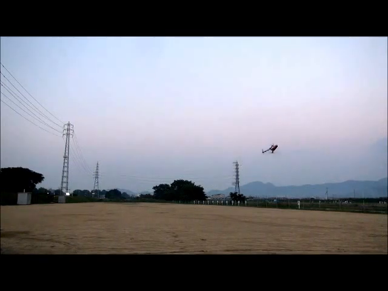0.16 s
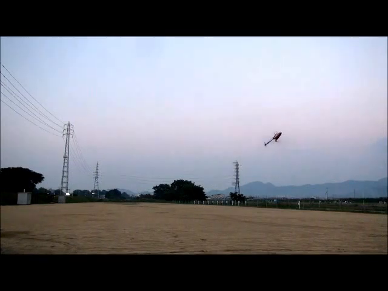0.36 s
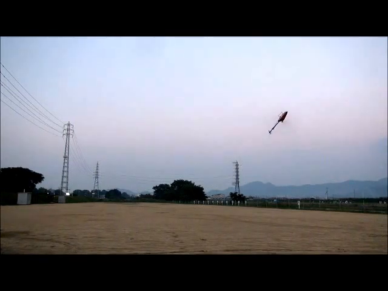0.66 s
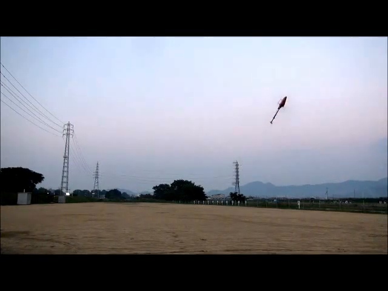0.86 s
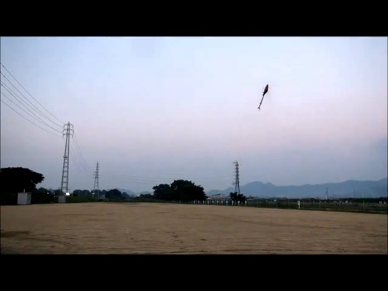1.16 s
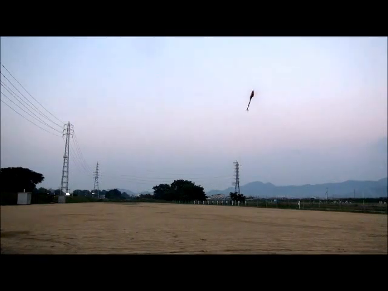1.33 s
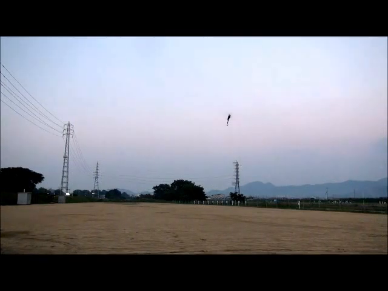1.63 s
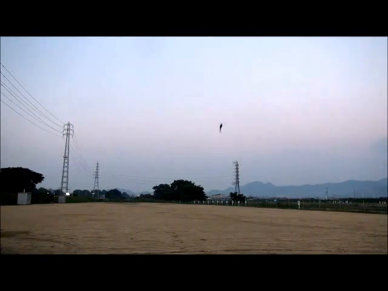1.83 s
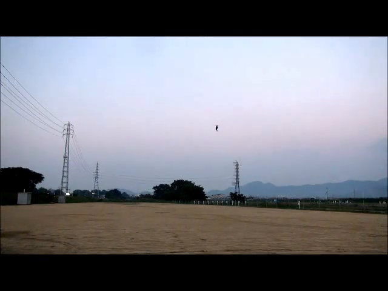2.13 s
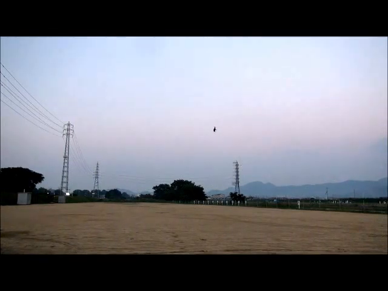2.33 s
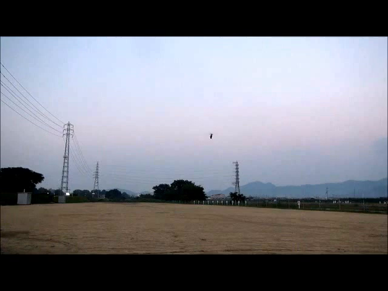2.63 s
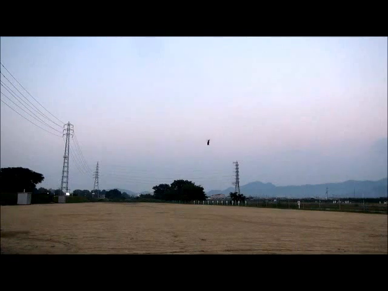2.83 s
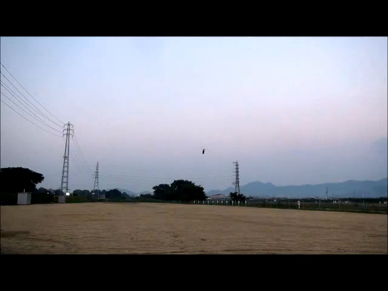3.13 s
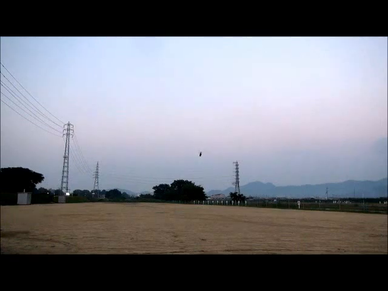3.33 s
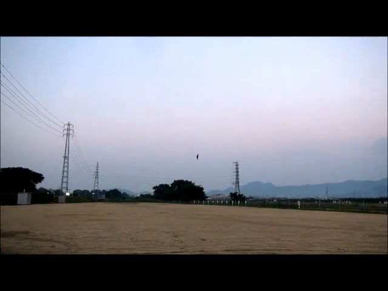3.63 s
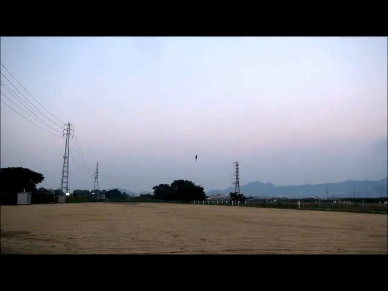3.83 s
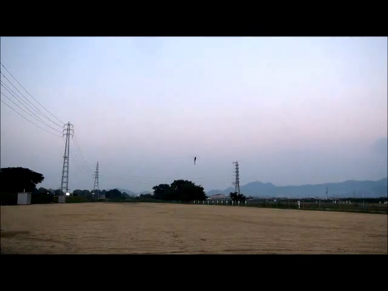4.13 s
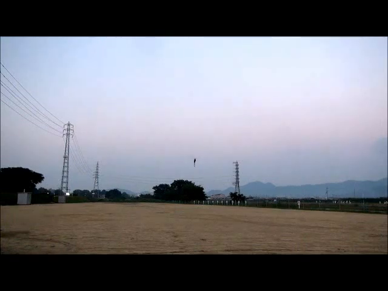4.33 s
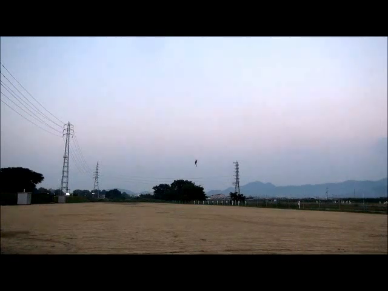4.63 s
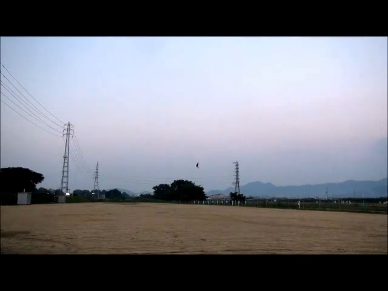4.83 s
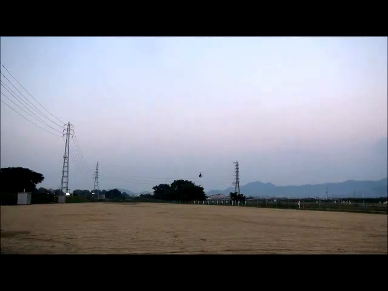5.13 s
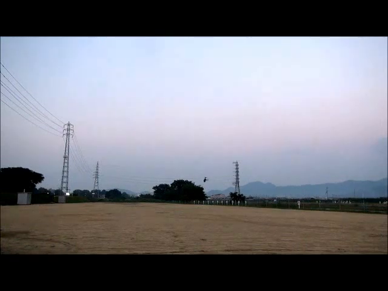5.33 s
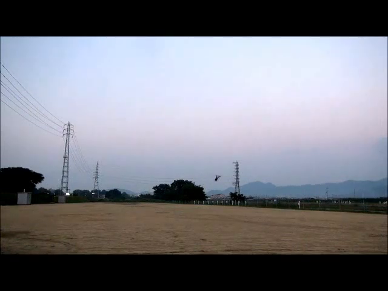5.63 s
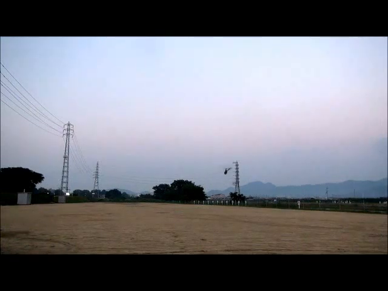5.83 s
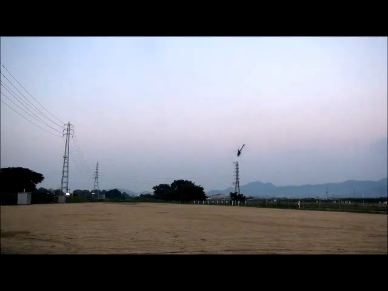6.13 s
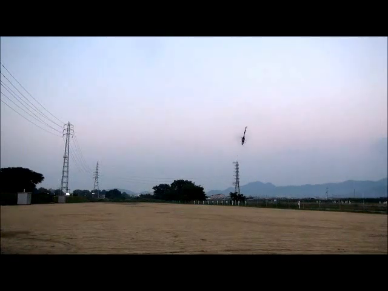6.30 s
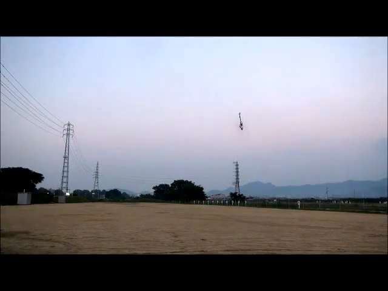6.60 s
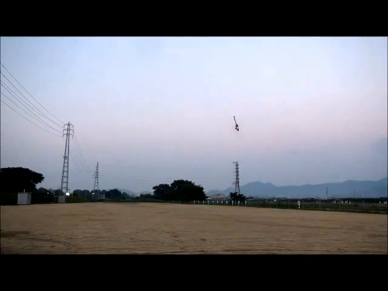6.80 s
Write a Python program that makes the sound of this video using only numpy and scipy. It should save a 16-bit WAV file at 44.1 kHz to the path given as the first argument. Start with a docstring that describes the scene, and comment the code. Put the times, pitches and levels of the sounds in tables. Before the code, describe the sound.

An electric model helicopter runs throughout about seven seconds over an open dirt field. At 0 s it is close: buzzing tail rotor, motor hum, rapid blade thump near 89 beats a second, and a raspy whine around 6.5 kHz with treble fizz. Rushing air grows until 0.9 s, when a sharp slap burst sounds and the pitch sags, lowest near 1.3 s, with duller knocking. The sound leans slightly right, then recentres. Pitch recovers around 2 s with more slaps and a swish. From 2.7 to 3.5 s the pulsing whine stands out; it dips, then rough gears and slaps swell at 4-4.7 s. Around 5.6 s the whine peaks again. At 6.4 s a strong low thump and rush arrive, pitch sags once more, and slaps continue to the end. A moving ground echo gives hollow, sweeping coloration; the narrow stereo microphone cuts the extreme treble.

```python
"""An electric model helicopter loops over a dirt field, moving away and back.
Its two blades thump with steady tones, swish with throbbing noise and slap their own wake in bursts.
The main gear whines and rasps, the tail rotor buzzes, the motor hums and the downwash rumbles.
The ground returns a slightly later copy, whose changing delay sweeps a comb through the sound."""
import sys
import numpy as np
from scipy import signal
from scipy.fft import rfft, irfft, next_fast_len
from scipy.io import wavfile
from scipy.ndimage import map_coordinates

SR = 44100
rng = np.random.default_rng(int(sys.argv[2]) if len(sys.argv) > 2 else 0)


def materialize(psi):
    """Save the field psi as 16-bit PCM at rate SR to the path in sys.argv[1].

    A 1-D psi becomes a single channel; in a 2-D psi each row is a channel.
    """
    bounded = np.clip(np.atleast_2d(psi).T, -1, 1)
    quanta = np.round(bounded * 32767).astype(np.int16)
    wavfile.write(sys.argv[1], SR, quanta)


N = 306936
TIME = np.arange(N) / SR

# tone cycles per turn of the main rotor
MESH_ORDER, BELT_ORDER = 150, 196
# shaft turns per turn of the main rotor
TAIL_GEARING, MOTOR_GEARING = 4.266, 12.5


def amp(db):
    """Turns decibels into a gain."""
    return 10 ** (np.asarray(db) / 20)


def unit(x):
    """Scales a signal to rms 1."""
    return x / np.sqrt(np.mean(x ** 2) + 1e-20)


def curve(rows):
    """Joins the points of a two-column table by straight lines in time."""
    seconds, values = np.transpose(rows)
    return np.interp(TIME, seconds, values)


def noise():
    """Makes white noise for the whole scene."""
    return rng.standard_normal(N)


def drift(per_s):
    """Wanders smoothly and by chance, with rms 1, changing about per_s times a second."""
    knots = signal.resample(rng.standard_normal(2048), 16384)  # eight points per random value
    return unit(np.interp(TIME * per_s * 8, np.arange(len(knots)), knots))


def tone(turns, wobble_rad, flutter_db, per_s):
    """A sine whose phase and level waver in the moving air."""
    phase = 2 * np.pi * (turns + rng.random()) + wobble_rad * drift(per_s)
    return np.sqrt(2) * np.sin(phase) * amp(flutter_db * drift(per_s))


def blade_ripple(turns, per_s):
    """Wavers at one, two and three times the blade-passing rate, each part drifting in strength."""
    ripple = np.zeros(N)
    for k in range(1, 4):
        ripple += drift(per_s) * np.cos(2 * np.pi * (2 * k * turns + rng.random()))
    return ripple


def shaped(x, points):
    """Filters a signal by a spectrum drawn with a logarithmic frequency axis."""
    hz, db = np.transpose(points)
    size = next_fast_len(N)
    bins_hz = np.fft.rfftfreq(size, 1 / SR)
    gain = amp(np.interp(np.log(bins_hz + 1), np.log(hz), db))
    return irfft(rfft(x, size) * gain, size)[:N]


def colour(x, points):
    """Gives a signal a spectrum and then rms 1."""
    return unit(shaped(x, points))


def below(x, hz, order=2):
    """Keeps what lies below a frequency, without delay."""
    sos = signal.butter(order, min(hz, SR / 2 - 1), fs=SR, output="sos")
    return signal.sosfiltfilt(sos, x)


def ground(x, delay_ms, strength=0.66, scatter_hz=1000, top_hz=10000):
    """Adds the echo off the dirt, which mirrors the bass, scatters the treble and dulls the very top."""
    # share of the treble that the ground mirrors: t/s, share/0-1
    mirror = [(0, 0.7), (.6, 0.16), (1.5, 0.22), (3, 0.7), (3.7, 0.42), (5.1, 0.53), (6.3, 0.31)]
    bass = below(x, scatter_hz, order=1)
    treble = below(x - bass, top_hz, order=1)
    echo = strength * bass + curve(mirror) * treble
    # read the echo from a moving point in the past
    echo = map_coordinates(echo, [np.arange(N) - delay_ms * SR / 1000], order=3)
    return (x + echo) / np.sqrt(1 + strength ** 2)


def downwash(level_db=-42.0):
    """The air that the rotor throws off makes a low, lumpy rumble."""
    # spectrum of the rumble: f/Hz, relative level/dB
    rumble = [(20, -39), (45, -5.5), (110, 0), (200, 3), (280, 3.5), (400, 3.5), (700, -4.5), (2000, -21),
              (8000, -20)]
    return amp(level_db + 1.8 * drift(5)) * colour(noise(), rumble)


def motor(turns):
    """The motor's rotating can hums once a revolution."""
    # level of the hum: t/s, level/dB
    hum_level = [(0, -35), (1, -48), (3.2, -48), (4.3, -50.5), (6, -55), (6.96, -43)]
    return amp(curve(hum_level)) * tone(MOTOR_GEARING * turns, 0.12, 1.9, 10)


def tail_rotor(turns):
    """A small two-bladed rotor, geared to the main shaft, buzzes at even multiples of its turning rate."""
    # overall level of the buzz: t/s, level/dB
    tail_level = [(0, -35.5), (.35, -36.5), (.6, -40.5), (.9, -37.5), (1.3, -46.5), (2, -38.5),
                  (2.6, -40.5), (3.65, -43), (4.2, -40), (5.5, -42), (6, -42.5), (6.96, -38)]
    # tones of the buzz: multiple of the tail shaft's rate, relative level/dB
    tail_tones = [(2, -1), (4, -5.5), (6, -14), (8, -16.5), (10, -14.5), (12, -15.5)]
    shaft = TAIL_GEARING * turns + 0.03 * drift(8)
    buzz = sum(amp(db) * tone(round(k) * shaft, 0.19, 2.4, 15) for k, db in tail_tones)
    return amp(curve(tail_level)) * buzz


def belt_whistle(turns):
    """A thin whistle, probably from the tail belt, follows the rotor's speed."""
    # level of the whistle: t/s, level/dB
    belt_level = [(0, -58), (.85, -32), (1.05, -49), (1.8, -51), (2.1, -57), (2.4, -43), (2.9, -71),
                  (3.7, -62), (4, -50), (5, -42.5), (5.3, -59), (6.65, -41.5), (6.96, -54)]
    return amp(curve(belt_level)) * tone(BELT_ORDER * turns, 0.35, 3.3, 22)


def gear_load(turns, grind=0.73):
    """The gear runs unevenly, eight times a turn."""
    return 1 + grind * np.cos(2 * np.pi * 8 * turns)


def fizz(turns):
    """The uneven gear fizzes in the treble, with thin tones around the octave of the mesh."""
    # level of the fizz: t/s, level/dB
    fizz_level = [(0, -32.5), (.25, -29.5), (.92, -39), (1.02, -37.5), (1.6, -42.5), (1.93, -31.5),
                  (2, -46), (2.7, -32.5), (3.2, -42), (3.38, -35), (3.66, -44.5), (4.1, -31), (5.1, -40.5),
                  (5.6, -31), (5.85, -37), (6.45, -32), (6.56, -38), (6.96, -38)]
    # spectrum of the fizz noise: f/Hz, relative level/dB
    fizz_spectrum = [(2000, -10), (5000, 2.5), (7500, 5), (8700, 5.5), (10000, 0), (11500, 2.5),
                     (13200, 4.5), (14200, -4), (15500, -11)]
    # thin tones: cycles per rotor turn
    upper_orders = [264, 284, 292, 308, 316]
    # the same tones against the fizz: relative level/dB
    upper_db = [-16, -16, -17, -12, -19]
    hiss = colour(noise() * gear_load(turns), fizz_spectrum)
    tones = sum(amp(db) * tone(k * turns, 0.68, 3.2, 17) for k, db in zip(upper_orders, upper_db))
    return amp(curve(fizz_level)) * (hiss + tones)


def side_tones(turns, heard_rate, strain_db=2.05):
    """Motor and gear tones grow as the heard rotor rate sags in hard turns (dB per turn/s)."""
    # tones: cycles per rotor turn
    drive_orders = [98, 132, 134, 137.5, 142, 158, 162.5, 187.5]
    # the same tones at the highest heard rotor rate: relative level/dB
    drive_db = [-19, -19.5, -19.5, -31, -14, -16, -19, -39]
    strain = amp(strain_db * (heard_rate.max() - heard_rate))
    return strain * sum(amp(db) * tone(k * turns, 0.8, 2.6, 13) for k, db in zip(drive_orders, drive_db))


def rasp(turns, noise_db=-6, comb_db=-5):
    """The teeth ring the gear: rough noise, with weak tones spaced by the blade-passing rate."""
    # spectrum of the ringing teeth: f/Hz, relative level/dB
    rasp_spectrum = [(3000, -77), (5200, -3.5), (5800, -8), (6400, 9.5), (6750, 4), (7200, -5), (7900, -15),
                     (9000, -33), (12000, -45)]
    # weak tones: blade-passing rates from the mesh tone (rounded below), relative level/dB
    sidebands = [(-8, -8), (0, 12), (0, -11), (1, 11), (2.5, 3), (4.5, 12), (6.5, 10), (7, -4), (10, 8),
                 (10.5, -27)]
    # stretching time makes the noise rise and fall in pitch with the rotor
    place = turns / turns[-1] * (N - 1)
    teeth = map_coordinates(colour(noise(), rasp_spectrum), [place], order=3)
    # the load on the teeth changes with every blade
    comb = sum(amp(db) * tone((MESH_ORDER + 2 * round(k)) * turns, .8, 3, 10) for k, db in sidebands)
    return amp(noise_db) * unit(teeth * gear_load(turns)) + amp(comb_db) * unit(comb)


def drive(turns, heard_rate):
    """The motor and gears sound together: side tones and rasp at one level, fizz at its own."""
    # level of the side tones and rasp: t/s, level/dB
    gear_level = [(0, -28.5), (.4, -25.5), (1, -29), (1.07, -27), (1.32, -35), (1.6, -37), (1.78, -29),
                  (2.35, -33.5), (2.75, -30), (3.35, -31), (3.66, -35.5), (4.08, -27), (5.2, -34.5),
                  (5.88, -31.5), (6.45, -24.5), (6.6, -31), (6.96, -30)]
    return amp(curve(gear_level)) * (side_tones(turns, heard_rate) + rasp(turns)) + fizz(turns)


def mesh_octave(turns):
    """The octave of the gear mesh is frayed by the passing blades."""
    # level of the octave: t/s, level/dB
    octave_level = [(0, -53), (1, -56), (1.4, -64), (1.9, -46), (2.3, -43), (2.7, -39), (2.9, -52),
                    (3.45, -34), (3.7, -52), (4.05, -47), (5, -42), (5.3, -44), (5.55, -49), (6.05, -36.5),
                    (6.96, -51)]
    fray = unit(1 + .3 * blade_ripple(turns, 6))
    return amp(curve(octave_level)) * fray * tone(2 * MESH_ORDER * turns, .7, 1.6, 20)


def beam(gap_db=-12):
    """The gear radiates in lobes: as the body turns, its tone arches from one gap to the next."""
    # moments when a gap between two lobes points at the listener: t/s
    beam_gaps = [.27, .46, .61, .8, 1.0, 1.23, 1.42, 1.63, 1.8, 1.99, 2.18, 2.5, 2.86, 3.2, 3.62, 3.85, 4.4,
                 4.8, 5.42, 6.42, 6.67, 6.9]
    # one more gap after the last, at the same spacing
    gaps = [0, *beam_gaps, 2 * beam_gaps[-1] - beam_gaps[-2]]
    lobe = np.interp(TIME, gaps, np.arange(len(gaps)))
    return np.hypot(np.sin(np.pi * lobe), amp(gap_db))


def whine(turns, swirl_rad=0.25, chop=0.08):
    """The pinion meets the main gear; passing blades and uneven teeth put sidebands on the tone."""
    # level in the middle of a lobe: t/s, level/dB
    mesh_level = [(0, -27), (.55, -22.5), (.88, -19.5), (1.1, -30), (1.33, -25.5), (1.5, -45), (1.72, -28),
                  (2.5, -35), (2.78, -18), (3.05, -22.5), (3.42, -22), (3.72, -30.5), (4.03, -22.5),
                  (4.3, -49), (4.85, -31), (5.08, -25.5), (5.6, -16.5), (5.95, -25), (6.3, -23),
                  (6.96, -32.5)]
    # the pitch sways once a turn
    sway = swirl_rad * np.sin(2 * np.pi * turns) / (2 * np.pi)
    mesh = tone(MESH_ORDER * turns + sway, .25, .7, 25)
    return amp(curve(mesh_level)) * beam() * mesh * (1 + chop * blade_ripple(turns, 5))


def swish(turns, throb=0.25):
    """Turbulence leaves the blades, louder as each one swings towards the listener."""
    # level of the rushing air: t/s, level/dB
    swish_level = [(0, -33), (.5, -28.5), (.92, -28), (1.2, -37.5), (1.66, -39), (1.89, -35.5),
                   (1.97, -28.5), (2.45, -37.5), (2.95, -31), (3.65, -40.5), (4.15, -33), (4.38, -28),
                   (4.75, -37.5), (5.55, -32), (5.95, -36), (6.4, -28), (6.96, -33)]
    # spectrum of the rushing air: f/Hz, relative level/dB
    swish_spectrum = [(60, -14), (150, 0.5), (300, 1), (600, 0.5), (1200, 1), (2500, 0.5), (4200, 1),
                      (5500, -5.5), (8000, -3.5), (11000, -9.5), (15000, -24)]
    beat = 1 + throb * np.cos(2 * np.pi * 2 * turns)
    return amp(curve(swish_level) + 0.87 * drift(25)) * colour(noise() * beat, swish_spectrum)


def bursts(attack_s=0.029, release_s=0.044):
    """Each burst swells, holds and dies away, sharing its power between a dull body and bright crack."""
    # bursts as the rotor meets its own wake: start t/s, length t/s, level/dB, crack against body/dB
    slap_bursts = [(0.144, .72, -38, 2), (0.903, 0.12, -26, 1.5), (1.04, .64, -36, -18),
                   (1.906, 0.23, -30.5, -6.5), (2.14, 0.11, -30.5, 0), (2.28, 0.6, -39, 39),
                   (2.71, 0.1, -30, 28), (2.86, 0.14, -32, 15), (3.166, 0.033, -29.5, -10),
                   (3.288, 0.033, -33.5, -5), (3.403, .12, -41, 6), (4.322, 0.19, -29.5, -1),
                   (4.525, 0.16, -30, 2.5), (5.298, 0.1, -37, 9), (5.555, 0.23, -34.5, 6.5),
                   (5.844, 0.033, -36, -2), (6.306, 0.32, -34.5, -10), (6.525, 0.26, -30.5, -3.5),
                   (6.773, 0.14, -30, -4), (6.91, .06, -26, -9)]
    body_power, crack_power = np.zeros(N), np.zeros(N)
    for start, length, db, bright_db in slap_bursts:
        age = TIME - start
        swell = np.clip(age / attack_s, 0, 1)
        fade = np.exp(-np.maximum(age - length, 0) / release_s)
        power = (amp(db) * swell * fade) ** 2
        dull = 1 / (1 + amp(bright_db) ** 2)
        body_power += dull * power
        crack_power += (1 - dull) * power
    return np.sqrt(body_power), np.sqrt(crack_power)


def slap(turns, split_hz=1500, scatter_db=1.1, rough=.38):
    """Each blade cuts the tip vortex of an earlier pass: a regular knock in a bright puff of noise."""
    # spectrum of knock and puff: f/Hz, relative level/dB
    slap_spectrum = [(150, -15), (380, 0), (550, 2.5), (900, 0), (1500, 3), (3000, 2), (4300, -5),
                     (6500, -12), (14000, -34)]
    jitter, spread = .004, .05  # shares of a blade period
    passes = 2 * turns + .02 * drift(5)
    blade = np.maximum(np.round(passes), 0).astype(int)
    # every blade pass has its own timing and size
    early, size = rng.standard_normal((1024, 2))[blade].T
    place = passes - blade + jitter * early
    force = amp(scatter_db * (size + .5 * drift(18)))  # the wake comes in clumps
    hit = np.diff(np.sign(place), prepend=1) > 0
    knock = colour(-force * hit, slap_spectrum)
    # the cut runs along the blade, so the lows of each knock trail its highs
    knock = signal.sosfilt([[-.85, 1, 0, 1, -.85, 0]] * 11, knock)
    puff = colour(force * np.exp(-.5 * (place / spread) ** 2) * noise(), slap_spectrum)
    body = unit(below(knock + rough * puff, split_hz))
    snap = puff + .5 * knock
    crack = unit(snap - below(snap, split_hz))
    body_gain, crack_gain = bursts()
    return body_gain * body + crack_gain * crack


def thump(turns, delay_ms):
    """Two loaded blades push the air twice a turn; only the higher tones get a ground echo here."""
    # level of the blade-passing tone: t/s, level/dB
    thump_level = [(0, -34), (.32, -28), (.9, -34.5), (1, -40.5), (1.24, -46), (1.5, -38.5), (1.85, -40),
                   (2.14, -52), (2.55, -37.5), (2.95, -37.5), (3.25, -52), (3.95, -39.5), (5, -41),
                   (5.58, -37), (6.02, -41), (6.42, -23), (6.96, -53)]
    # level of its octave, which the higher tones follow: t/s, level/dB
    octave_level = [(0, -34), (.33, -32), (.6, -43), (.87, -41), (.97, -33.5), (1.4, -47.5), (1.8, -49.5),
                    (1.98, -39.5), (2.7, -37.5), (3.3, -42.5), (4.05, -39), (5.5, -37.5), (5.8, -40),
                    (6.4, -38.5), (6.55, -28), (6.78, -38.5), (6.96, -41)]
    # higher blade tones: cycles per rotor turn, level against the octave/dB
    blade_tones = [(3, -18.5), (6, -6), (8, -15), (10, -14)]
    octave_gain = amp(curve(octave_level))
    first = amp(curve(thump_level)) * tone(2 * turns, 0.1, 1.0, 13)
    octave = octave_gain * tone(4 * turns, 0.089, 1.47, 14)
    high = sum(amp(db) * tone(round(k) * turns, 0.27, 1.85, 10) for k, db in blade_tones)
    return first + octave + octave_gain * ground(high, delay_ms)


def scene():
    """All turning parts follow one rotor angle, and two close microphone ports hear the mixture."""
    # rotor rate as heard with Doppler shift, sagging in the two hard turns: t/s, turning rate f/Hz
    flight = [(0.0, 44.55), (0.18, 44.5), (0.84, 43.83), (1.11, 41.44), (1.33, 40.8), (1.66, 41.51),
              (1.92, 42.9), (2.66, 43.66), (3.05, 43.91), (3.44, 43.6), (3.88, 43.46), (4.3, 43.98),
              (4.74, 44.18), (5.27, 44.7), (5.81, 44.31), (6.34, 43.58), (6.6, 41.54), (6.74, 41.43),
              (6.96, 42.6)]
    # delay of the ground echo, longest when the model is high and near: t/s, delay/ms
    echo_delay = [(0, 1.02), (.6, 1.34), (1.28, 1.73), (1.55, 1.7), (1.9, 1.38), (2.5, 1.31), (3.44, .93),
                  (4.95, .84), (5.3, .69), (5.7, .65), (6.02, .79), (6.4, 1.26), (6.7, 1.44), (6.96, 1.42)]
    # how much the two ports differ: f/Hz, side against mid level/dB
    ports = [(30, -2), (90, -46), (280, -21.5), (1000, -51), (2300, -38.5), (8500, -28.5), (12000, -64)]
    # the model swings out to the right, then returns ahead: t/s, left minus right level/dB
    pan = [(0, 0), (.9, -.9), (1.9, -.1), (6.96, 0)]
    heard_rate, delay_ms = curve(flight), curve(echo_delay)
    turns = np.cumsum(heard_rate) / SR
    machine = downwash() + motor(turns) + tail_rotor(turns) + drive(turns, heard_rate)
    machine += swish(turns) + slap(turns)
    tones = belt_whistle(turns) + mesh_octave(turns) + whine(turns) + thump(turns, delay_ms)
    mid = ground(machine, delay_ms) + tones
    # the ports hear nearly the same thing, a little apart in phase
    quarter_turn = signal.hilbert(mid, next_fast_len(N))[:N].imag
    side = shaped(quarter_turn, ports)
    lean = amp(curve(pan) / 2)
    return np.array([(mid + side) * lean, (mid - side) / lean])


def record(dry, edge_hz=15700):
    """The microphone's band limit removes the sound above its upper edge."""
    low_pass = signal.firwin(511, edge_hz, window=("kaiser", 9), fs=SR)
    return signal.oaconvolve(dry, low_pass[None], "same")


dry = scene()
out = record(dry)
materialize(out)
```